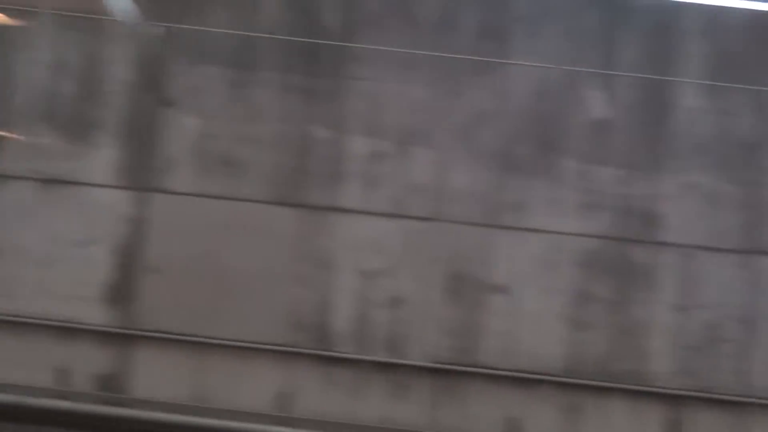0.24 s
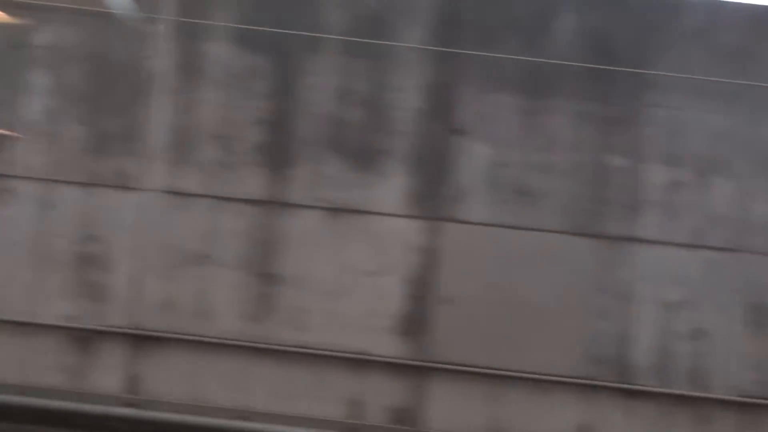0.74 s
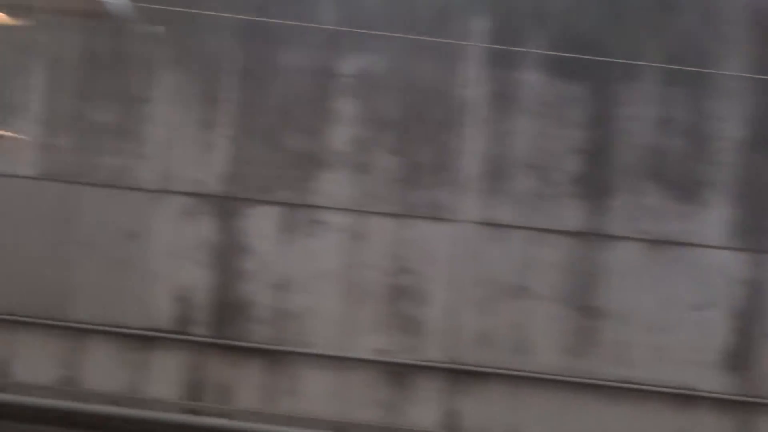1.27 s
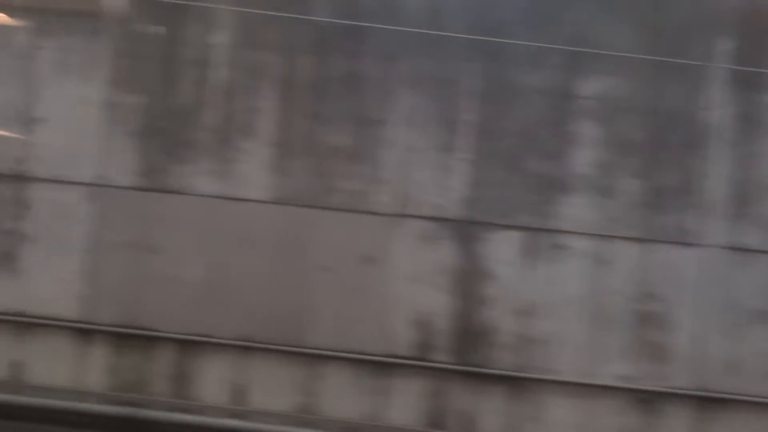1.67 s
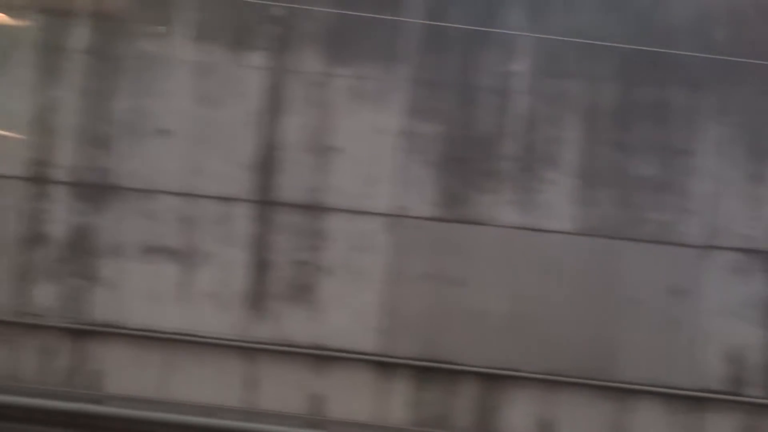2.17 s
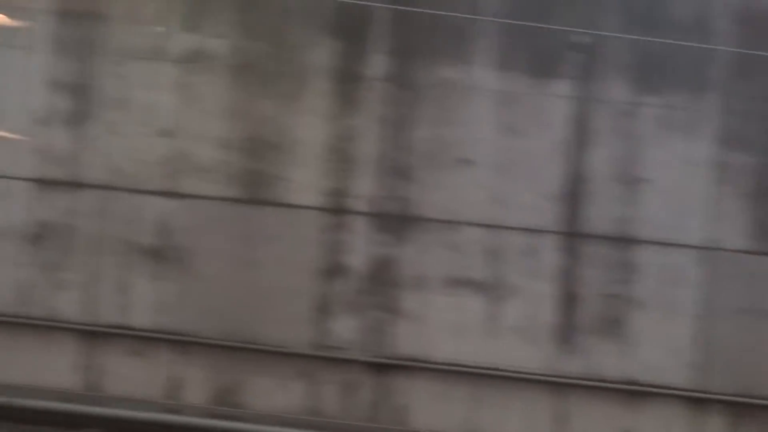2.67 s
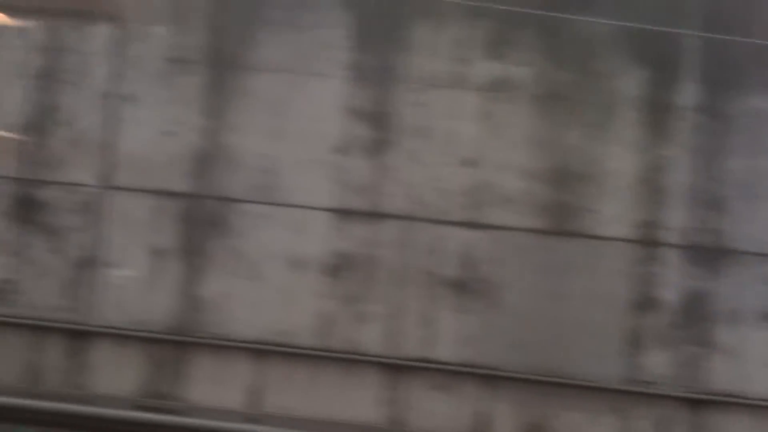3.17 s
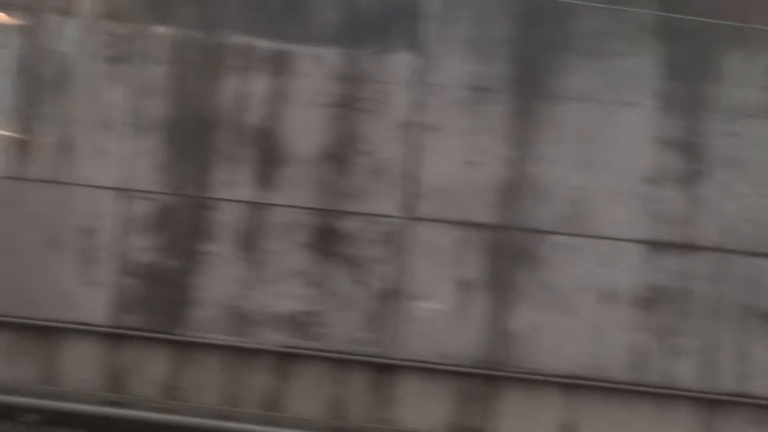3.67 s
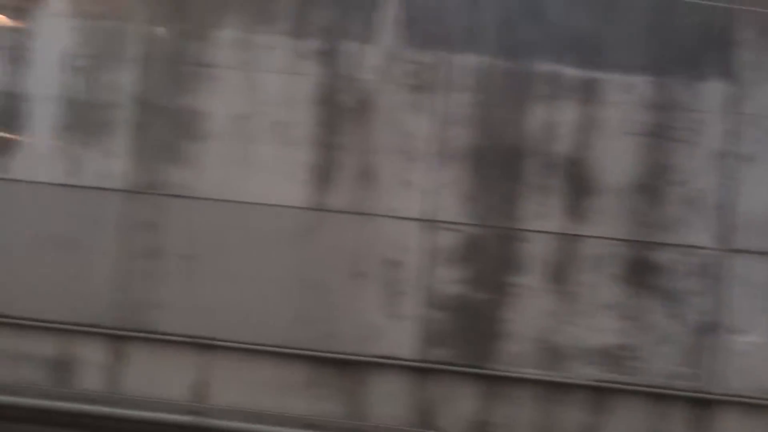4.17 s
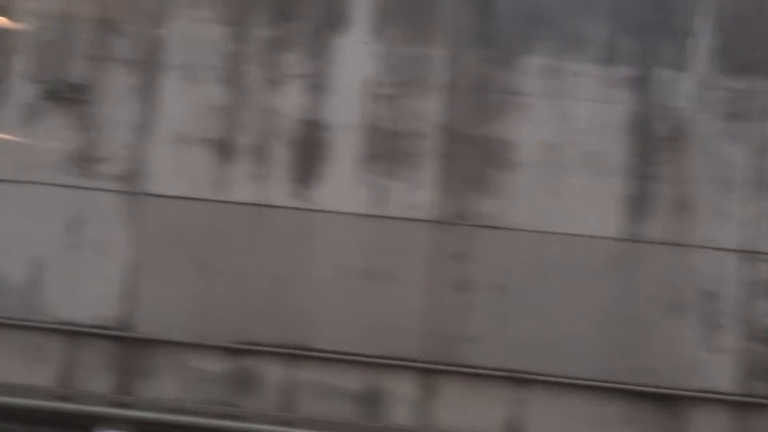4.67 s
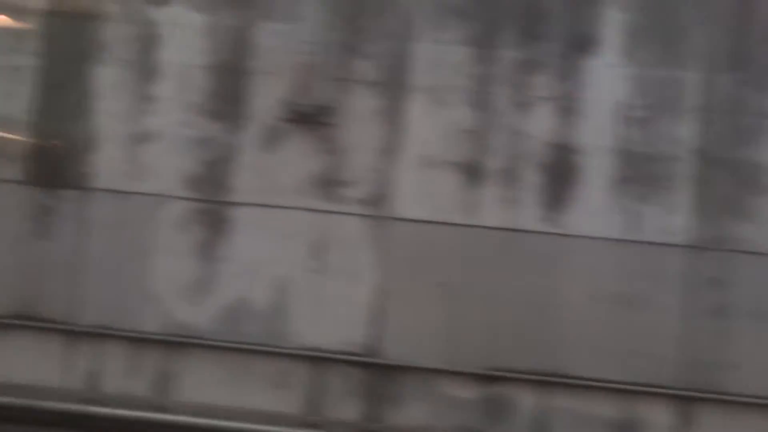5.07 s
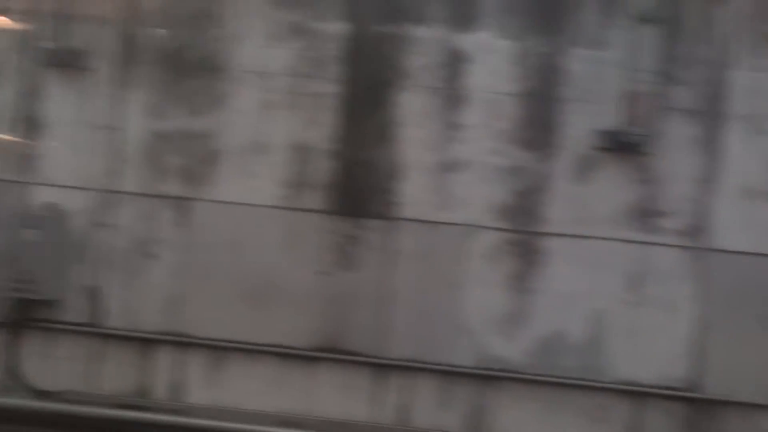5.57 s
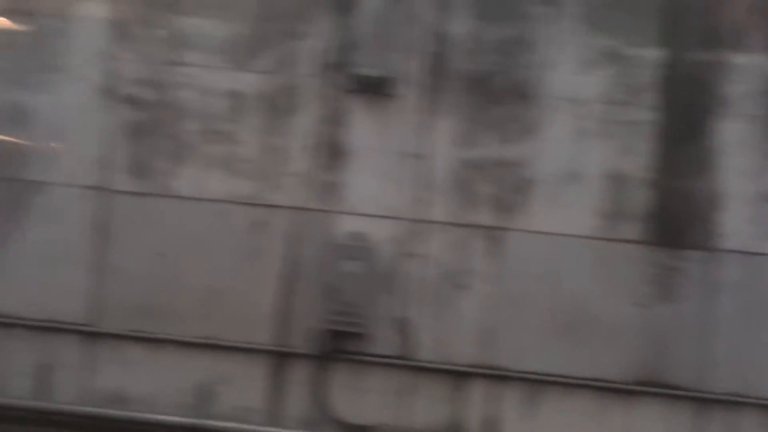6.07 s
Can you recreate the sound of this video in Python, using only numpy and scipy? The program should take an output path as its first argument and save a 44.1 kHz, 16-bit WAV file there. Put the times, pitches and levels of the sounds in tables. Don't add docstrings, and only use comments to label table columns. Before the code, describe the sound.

Continuous train carriage rumble with uneven thuds, a wavering mid-low drone, a gear whine creeping upward, and soft puffs of air hissing through a door seal.

```python
import sys
import numpy as np
from scipy import signal
from scipy.fft import rfft, irfft, next_fast_len
from scipy.io import wavfile
from scipy.ndimage import map_coordinates

SR = 44100
rng = np.random.default_rng(int(sys.argv[2]) if len(sys.argv) > 2 else 0)


def ratio(d):
    e = np.asarray(d, float) / 20
    return 10 ** e


def store_pcm(level_fs):
    pcm = np.round(np.clip(level_fs, -1, 1) * 32767).astype(np.int16)
    wavfile.write(sys.argv[1], SR, np.atleast_2d(pcm).T)


N = 278712
STEP_S = 0.002


def rolling():
    # (frequency [Hz], level [dB per Hz])
    floor_spectrum = [(11, -48), (18, -16), (97, -8.5), (156, -1.5), (204, -3.5), (259, -13), (285, -6),
                      (339, -5), (411, -9.5), (564, -13), (641, -10.5), (705, -20.5), (800, -25),
                      (1040, -55.5), (1760, -120)]
    # (frequency [Hz], width [Hz], height [dB])
    floor_peaks = [(70.7, 15, 6), (144.5, 13, 2.5), (173.7, 3.3, 3.5), (217, 13, 8.5), (271.6, 25, 5),
                   (354.2, 17, 6.5), (410, 15, -0.5), (452.5, 20, 4)]
    # (frequency [Hz], level [dB per Hz])
    rail_spectrum = [(410, -25), (700, -0.5), (844, -9), (1270, -7), (1500, -12.5), (1800, -12.5),
                     (2100, -17), (2400, -16.5), (2860, -22.5), (3540, -25), (4500, -49), (5850, -70.5),
                     (9900, -120)]
    # (frequency [Hz], width [Hz], height [dB])
    wheel_peaks = [(893, 40, 3), (1021, 22, 4), (1255, 38, 4), (1500, 70, -2), (1600, 10, 8), (1810, 70, 5),
                   (1967, 35, 5), (2045, 50, -3), (2209, 40, 3), (2255, 40, -3), (2317, 45, 4),
                   (2469, 32, 7), (2675, 30, 4), (2960, 120, -2), (3200, 30, 3), (3295, 40, 4),
                   (3420, 150, -2), (3533, 11, 10), (3595, 20, 10), (3632, 18, 6)]
    # (time [s], thud change [dB], boom change [dB], rumble change [dB])
    jolts = [(.23, 8, -13, 0.5), (.42, 1, 4, 1), (.49, 9.5, 0, 0.5), (.94, -6, -2.5, 0),
             (1.03, 1.5, 6.5, -1.5), (1.28, 5.5, -2, -0.5), (1.51, -2.5, -6.5, -3.5), (2.38, 3, -1, 3.5),
             (2.45, 8.5, 2.5, 0.5), (2.66, -1, 0.5, -0.5), (2.8, 8.5, 3, 1.5), (3.33, 10.5, -7.5, 0.5),
             (4.7, 11, -1.5, 1.5), (4.81, 1.5, -12.5, 1), (5.13, 1.5, 9.5, 1), (5.22, 4, -7, 2),
             (5.28, 0, 5.5, 0), (5.36, 0, -6, -2), (5.49, 3.5, 8, -1.5), (5.84, -3.5, -7.5, 0)]
    jolt_s = 0.082

    times, *shift_db = np.transpose(jolts)
    bumps = np.exp(-2 * (since(times) / jolt_s) ** 2)
    thud_db, boom_db, rumble_db = fine(*np.array(shift_db) @ bumps)

    floor = rush(floor_spectrum, floor_peaks)
    deep = below(floor, 100)
    low = below(floor, 180)
    thud = ratio(-37.5 + thud_db) * unit(deep)
    boom = ratio(-30 + boom_db) * unit(low - deep)
    rumble = ratio(-26.5 + rumble_db) * unit(floor - low)
    roar = ratio(-38.5) * rush(rail_spectrum, wheel_peaks)
    return thud + boom + rumble + roar


def panel():
    # (time [s], top level [dB], rise [s], fall [s])
    swells = [(.26, -22.5, 0.48, 0.1), (.61, -22, 0.26, 0.13), (.81, -25, .04, 0.065),
              (.92, -24.5, 0.031, .3), (1.11, -21, .3, 0.081), (1.36, -22, 0.16, 0.043),
              (1.64, -25, .5, 0.036), (1.94, -20, .35, 0.032), (2.16, -27, 0.026, 0.067),
              (2.31, -24.5, 0.29, 0.36), (2.64, -25, 0.039, 0.35), (2.82, -23, .1, .2),
              (2.96, -22, .08, 0.1), (3.26, -21.5, 0.13, .05), (3.47, -28.5, .3, .06),
              (3.7, -23.5, 0.11, 0.36), (3.91, -21, .08, .045), (4.13, -18.5, 0.037, 0.11),
              (4.35, -24, 0.23, .04), (4.61, -21.5, 0.16, 0.074), (4.81, -22, 0.14, .045),
              (4.89, -23, 0.032, 0.018), (5.07, -19, 0.072, 0.21), (5.55, -20.5, 0.13, 0.076),
              (5.65, -22.5, 0.063, 0.25), (6.05, -19.5, .22, 0.13)]
    swell_db = 13
    rest_db = -40.5
    roundness = 1.24

    top_db, away = peaked(swells)
    swelling_db = top_db - 0.6 - swell_db * away ** roundness
    level_db, = fine(np.maximum(swelling_db.max(0), rest_db))
    drone = tone(338.7, level_db, flutter_db=1.2, rate=16, drift_hz=1.3)
    return drone * ratio(np.array([[1.2], [-1.2]]))


def gears():
    # (time [s], tooth rate [Hz])
    tooth_rate = [
        (0, 611),
        (.65, 609),
        (1.35, 615.5),
        (2.2, 629),
        (2.9, 631.8),
        (3.8, 637.2),
        (4.7, 641.2),
        (6.32, 650.2),
    ]
    # (time [s], level [dB])
    torque = [(0, -35), (.2, -35), (.7, -36.5), (1.03, -41.5), (1.33, -42), (1.43, -35), (2.2, -32.5),
              (2.5, -33), (2.9, -35.5), (3.3, -33.5), (3.5, -30.5), (4.15, -29.5), (4.27, -32),
              (4.88, -29.5), (5.05, -35), (5.5, -33.5), (5.85, -33), (6.32, -34.5)]
    whine = tone(curves(tooth_rate)[0], curves(torque)[0] + 0.7, flutter_db=0.5, rate=16, drift_hz=0.3)
    return whine * ratio(np.array([[0.6], [-0.6]]))


def seal():
    # (time [s], top level [dB], rise [s], fall over 10 dB [s], draught gain [dB])
    puffs = [
        (1.33, -66, .26, 0.1, 0.5),
        (1.87, -68.5, .1, 0.5, 1.5),
        (2.8, -61.5, .16, .24, 4),
        (3.63, -65, .24, .24, 0.5),
        (4.45, -71.5, .2, 0.6, .5),
        (5.39, -62, 0.22, 0.24, 2.5),
        (6.27, -61.5, .14, .1, 1),
    ]
    leak_db = -80
    top_db, away = peaked(puffs)
    flow = ratio(leak_db) + ratio(top_db - 10 * away ** 1.6).sum(0)
    lift_db = np.transpose(puffs)[-1] @ ratio(-10 * away ** 2)
    flow, lift_db = fine(flow, lift_db)
    return draught(lift_db) + jet(flow) + whistles() + side_tones()


def draught(lift_db):
    # (frequency [Hz], level [dB per Hz])
    hiss_spectrum = [(2180, -22), (3700, -7), (3810, -18.5), (4080, -7), (5860, -9), (6300, -7.5),
                     (6810, -14), (9170, -18.5), (11300, -10.5), (12300, -21.5), (14300, -19.5),
                     (15700, -26.5)]
    # (frequency [Hz], width [Hz], height [dB])
    duct_peaks = [(3880, 150, 2.5), (4180, 130, -2), (4390, 150, 2), (4630, 130, 1), (4870, 130, 1.2),
                  (5190, 170, -3), (6080, 90, 1), (6300, 200, -3), (6770, 200, 2.5)]
    hiss = rush(hiss_spectrum, duct_peaks)
    dull = below(hiss, 9000)
    sway_db = 0.5 * wobble(6)
    return ratio(-64 + lift_db + sway_db) * unit(dull) + ratio(-69.5) * unit(hiss - dull)


def jet(flow):
    # (frequency [Hz], level [dB per Hz])
    jet_spectrum = [(3000, -43), (3800, -17), (4400, -12), (6000, -15.5), (8000, -9.5), (9200, -23.5),
                    (10200, -4.5), (11800, -1.5), (12600, -3.5), (13200, -14), (15500, -16), (15800, -31.5)]
    # (frequency [Hz], width [Hz], height [dB])
    throat_peaks = [(7800, 1300, 3.5)]
    full_db = -59
    noise = rush(jet_spectrum, throat_peaks)
    body = below(noise, 11900)
    opening = (flow / ratio(full_db)) ** 0.5
    return flow * ratio(0.6 * wobble(14)) * (body + opening * (noise - body))


def whistles():
    # (start [s], rise [s], hold [s], fall [s], top pitch [Hz])
    blows = [
        (2.668, .08, .09, .13, 12830),
        (5.235, .115, .028, .078, 12530),
    ]
    onset_hz = 10620
    weak_hz, weak_db_per_khz = 12500, 24
    sound = 0
    for start, rise, hold, fall, top_hz in blows:
        length = rise + hold + fall
        t = np.arange(N) / SR - start
        growing = np.sin(np.pi / 2 * np.clip(t / rise, 0, 1))
        fading = np.clip((length - t) / fall, 0, 1)
        hz = onset_hz + (top_hz - onset_hz) * np.minimum(growing, fading)
        thinning_db = weak_db_per_khz * np.clip(hz - weak_hz, 0, None) / 1000
        rising_db = -2.5 * np.clip(1 - t / rise, 0, 1)
        sound = sound + whistle(hz, -59.5 - thinning_db + rising_db, start, start + length)
    return sound


def side_tones():
    # (start [s], end [s], pitch [Hz], level [dB])
    pipes = [
        (2.73, 2.77, 10350, -66),
        (2.785, 2.825, 10480, -65),
        (2.842, 2.875, 10420, -67),
        (2.73, 2.85, 12420, -70),
        (5.222, 5.25, 10700, -62),
        (5.438, 5.478, 10900, -60),
        (5.478, 5.492, 11300, -63),
    ]
    return sum(whistle(hz, db, start, end) for start, end, hz, db in pipes)


def fitting():
    # (start [s], end [s], pitch [Hz], level [dB])
    squeaks = [
        (3.31, 3.37, 14550, -82),
        (3.335, 3.37, 13300, -73),
        (3.33, 3.375, 12150, -76),
        (3.35, 3.39, 7950, -78),
        (3.39, 3.44, 12150, -76),
        (3.38, 3.435, 14550, -78),
        (3.41, 3.44, 6600, -76),
    ]
    # (time [s], peak level [dB], pitch [Hz], time to fall 60 dB [s])
    ticks = [
        (1.733, -57, 9300, .1),
        (1.838, -58, 10700, .06),
        (1.89, -58, 10800, .04),
        (2.085, -58, 10500, .05),
        (5.48, -59, 11300, .03),
        (6.14, -56, 11400, .03),
    ]
    sound = 0
    for start, end, hz, db in squeaks:
        squeak = tone(hz, db, flutter_db=2.5, rate=60, drift_hz=15)
        sound = sound + sounding(start, end, fade=0.008) * squeak
    t = np.arange(SR // 20) / SR
    for start, db, hz, t60 in ticks:
        slow_noise = np.convolve(rng.standard_normal(len(t)), np.hanning(60) / 5, "same")
        rattle = slow_noise * np.sin(2 * np.pi * hz * t)
        click = np.diff(rng.standard_normal(len(t) + 2), 2) / 5
        sound[round(start * SR):][:len(t)] += ratio(db - 5 - 60 * t / t60) * (click + rattle)
    return sound


def whistle(hz, db, start, end):
    core = tone(hz, db - 1.5, flutter_db=3.2, rate=70, drift_hz=65)
    halo = tone(hz, db - 7, flutter_db=2.5, rate=500, drift_hz=260)
    to_right = ratio(np.array([[-1.2], [1.2]]))
    return sounding(start, end, fade=0.012) * (core + halo) * to_right


def tone(hz, db, flutter_db, rate, drift_hz):
    phase = 2 * np.pi * np.cumsum(hz + drift_hz * wobble(rate)) / SR
    return np.sqrt(2) * ratio(db + flutter_db * wobble(rate)) * np.sin(phase)


def rush(spectrum, peaks):
    # (frequency [Hz], likeness [0 to 1])
    alike = [(30, .9995), (90, .999), (250, 0.98), (640, 0.89), (1400, 0.9), (3100, 0.87), (6000, 0.79),
             (9000, 0.77), (10800, 0.95), (12200, 0.93), (16000, 0.9)]

    def colour(hz):
        level_db = along(spectrum, hz)
        for centre, width, db in peaks:
            level_db = level_db + db / (1 + (2 * (hz - centre) / width) ** 2)
        turn = np.arccos(np.clip(along(alike, hz), 0, 1)) / 2
        return ratio(level_db) * np.array([np.cos(turn), np.sin(turn)])

    mid, side = filtered(rng.standard_normal((2, N)), colour)
    return unit(np.array([mid + side, mid - side]))


def below(x, edge_hz):
    return filtered(x, lambda hz: 1 / (1 + (hz / edge_hz) ** 8))


def filtered(x, response):
    m = next_fast_len(N + 8192)
    return irfft(rfft(x, m) * response(np.fft.rfftfreq(m, 1 / SR)), m)[..., :N]


def unit(x):
    return x / np.sqrt(np.mean(np.abs(x) ** 2) + 1e-20)


def along(points, hz):
    f, value = np.transpose(points)
    return np.interp(np.log(hz + 1), np.log(f + 1), value)


def wobble(rate):
    knots = rng.standard_normal(int(N * rate / SR) + 4)
    return map_coordinates(knots, [np.arange(N) * rate / SR], order=2)


def sounding(start, end, fade):
    t = np.arange(N) / SR
    return np.clip(np.minimum(t - start, end - t) / fade, 0, 1)


def curves(rows):
    times, *columns = np.transpose(rows)
    return [np.interp(np.arange(N) / SR, times, column) for column in columns]


def since(moments):
    return np.arange(0, N / SR + STEP_S, STEP_S) - np.asarray(moments)[:, None]


def fine(*controls):
    return curves(np.transpose([since([0])[0], *controls]))


def peaked(rows):
    times, top_db, rise, fall = np.transpose(rows)[:4, :, None]
    t = since(times[:, 0])
    return top_db, np.maximum(-t / rise, t / fall)


def scene():
    return rolling() + panel() + gears() + seal() + fitting()


def roll_off(x):
    return signal.sosfilt(signal.butter(12, 15850, fs=SR, output="sos"), x)


def record(dry):
    # (frequency [Hz], level difference [dB])
    lean = [(60, .5), (200, .5), (380, 1.5), (700, 1.5), (1290, 1), (2380, 1.5), (4400, .5), (8100, -1.3),
            (12000, -1), (13500, 0)]
    # (frequency [Hz], phase lead [rad])
    lead = [(30, -.05), (150, -.26), (520, -.26), (1800, -.1), (6000, .1), (11500, 0)]
    top_hz = 15740
    half = np.array([[0.5], [-0.5]])

    def hearing(hz):
        return (hz < top_hz) * ratio(half * along(lean, hz)) * np.exp(1j * half * along(lead, hz))

    dry = dry * sounding(0, N / SR, fade=0.004)
    return roll_off(filtered(dry, hearing))


dry = scene()
out = record(dry)
store_pcm(out)
```